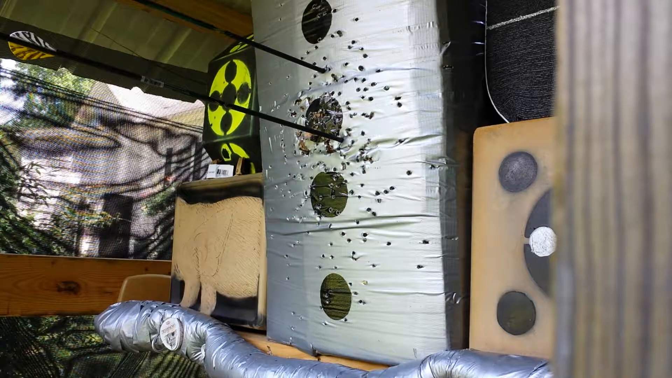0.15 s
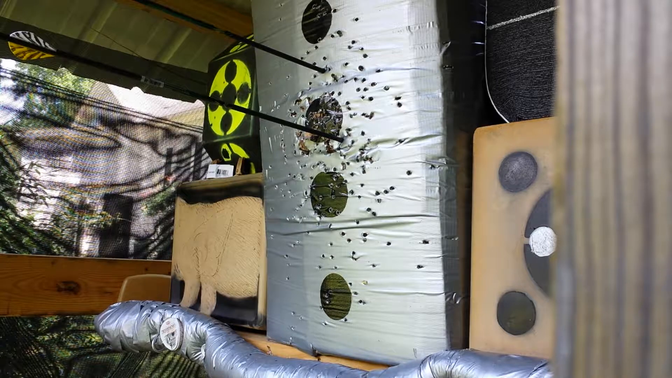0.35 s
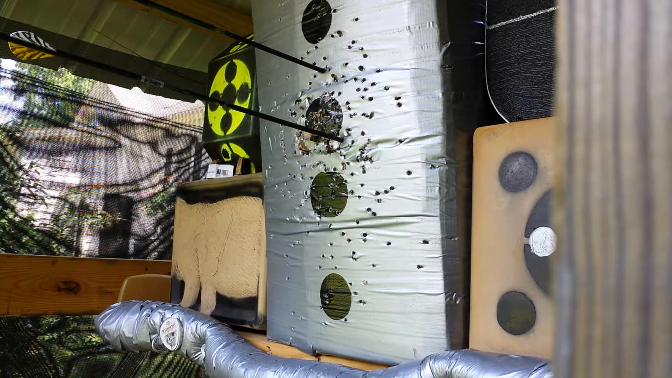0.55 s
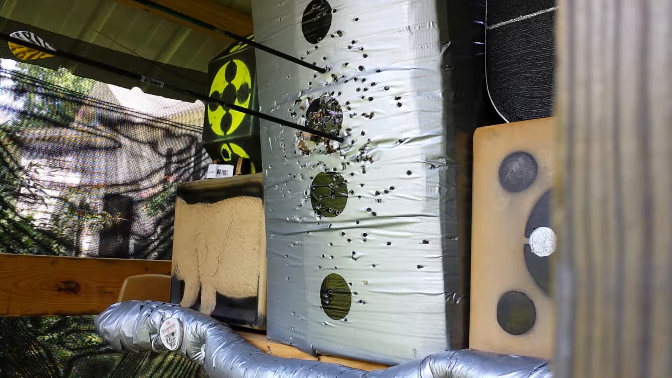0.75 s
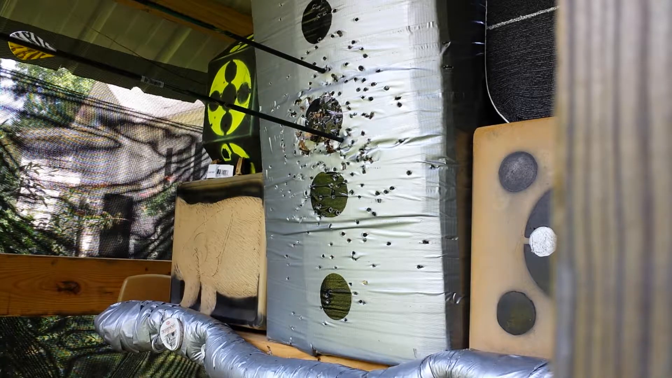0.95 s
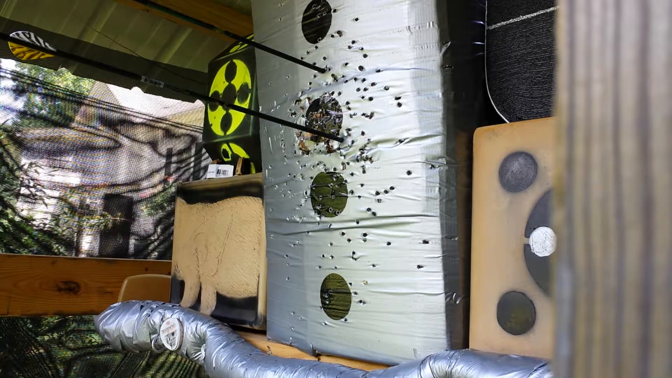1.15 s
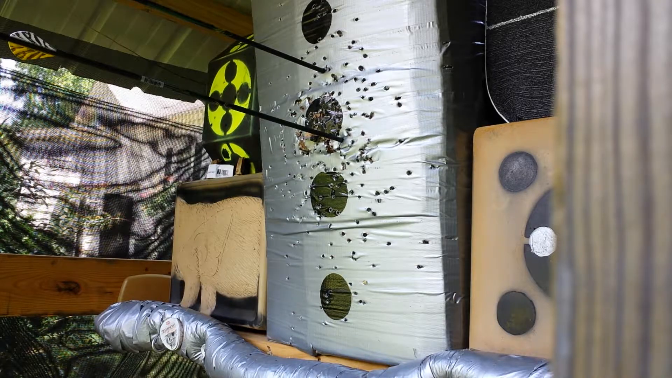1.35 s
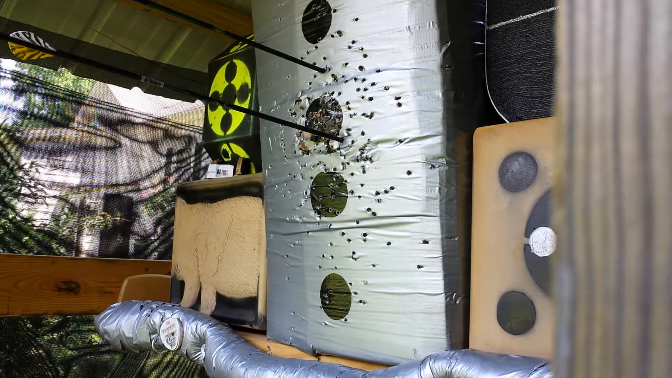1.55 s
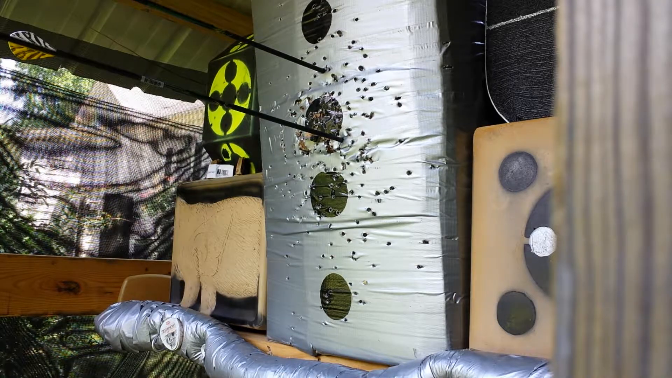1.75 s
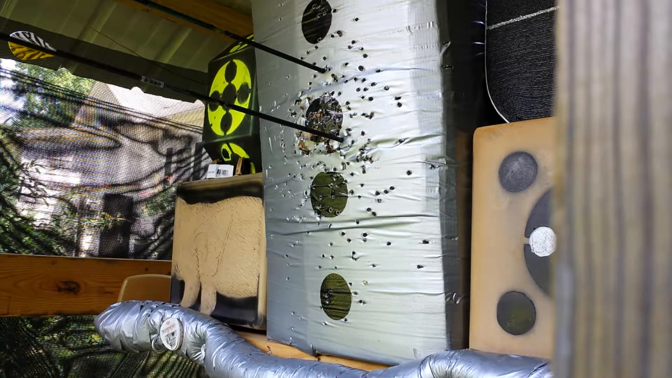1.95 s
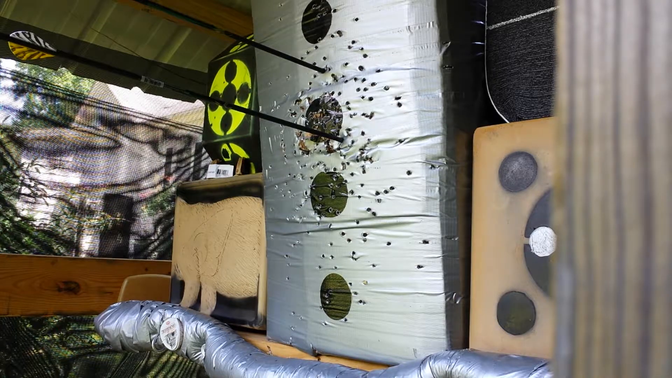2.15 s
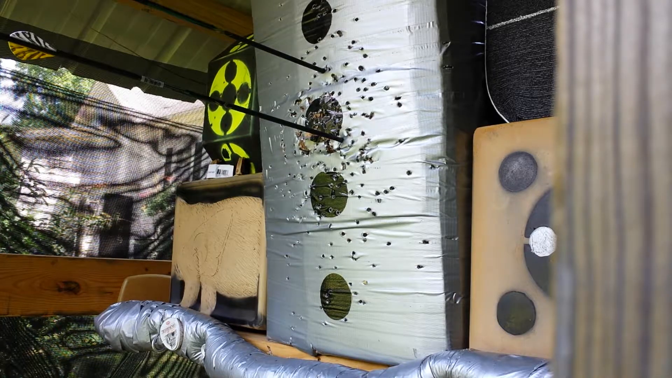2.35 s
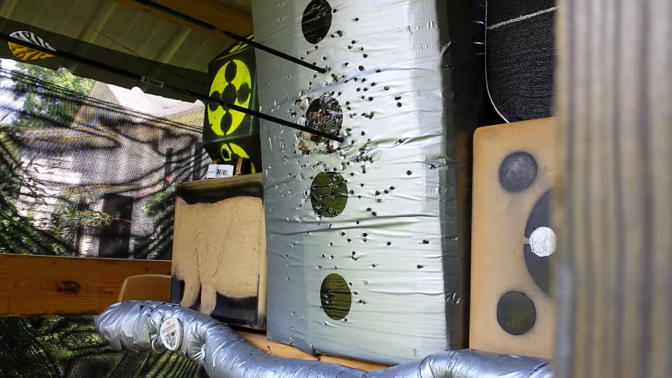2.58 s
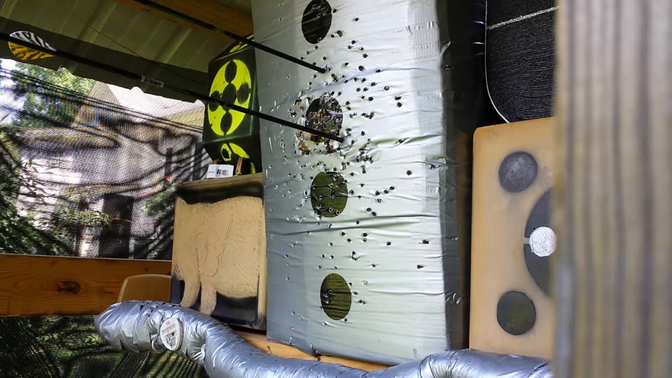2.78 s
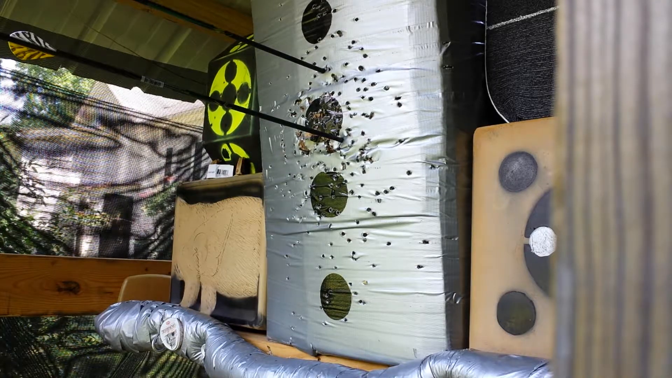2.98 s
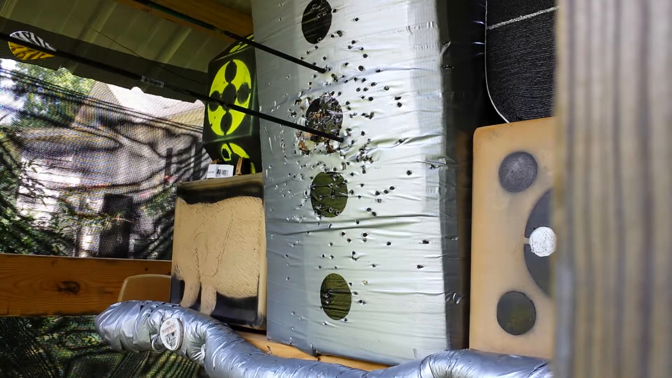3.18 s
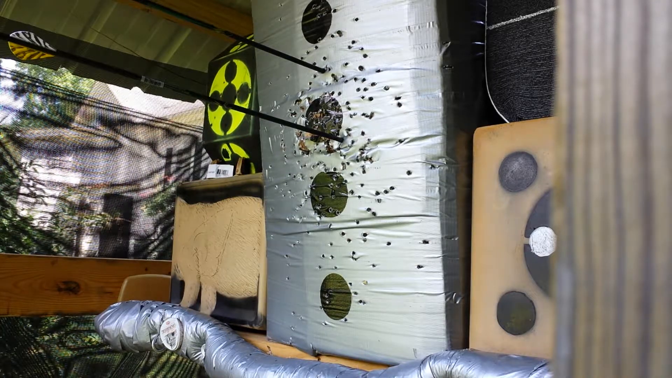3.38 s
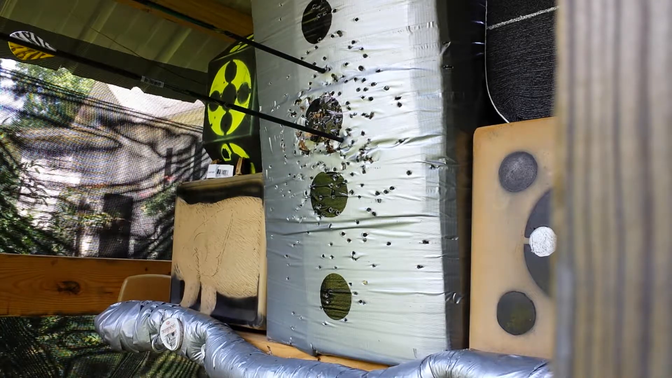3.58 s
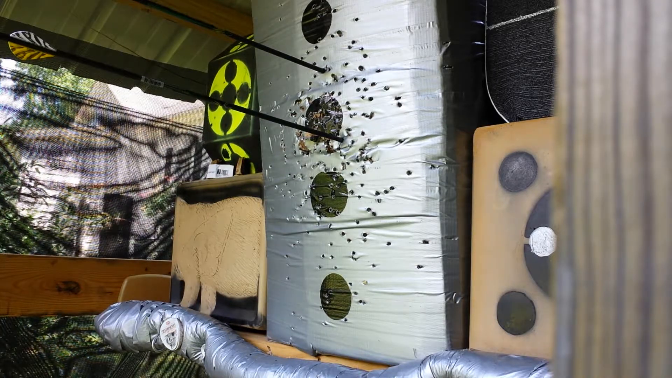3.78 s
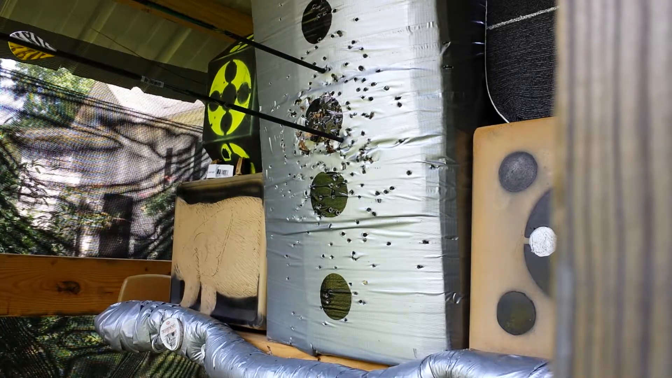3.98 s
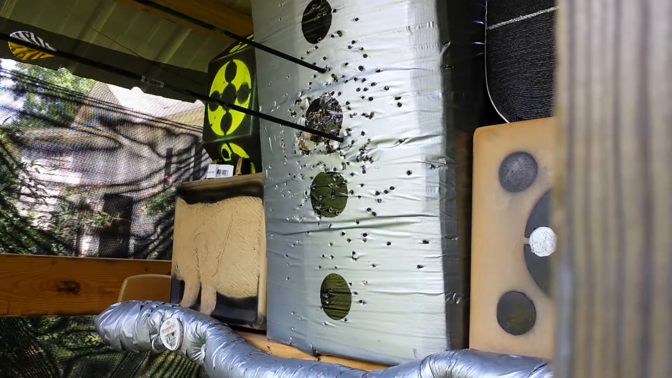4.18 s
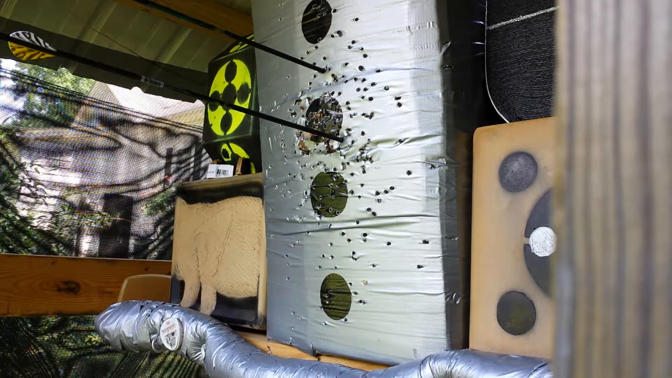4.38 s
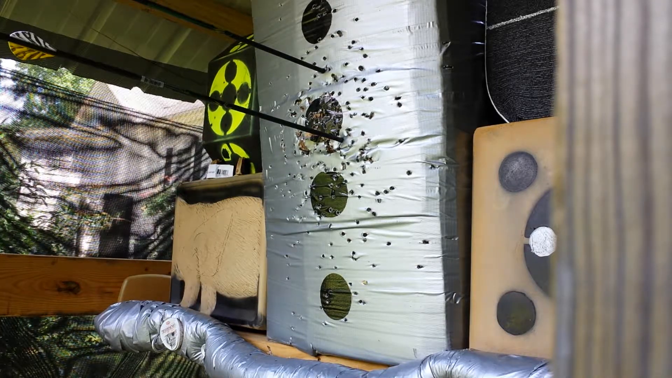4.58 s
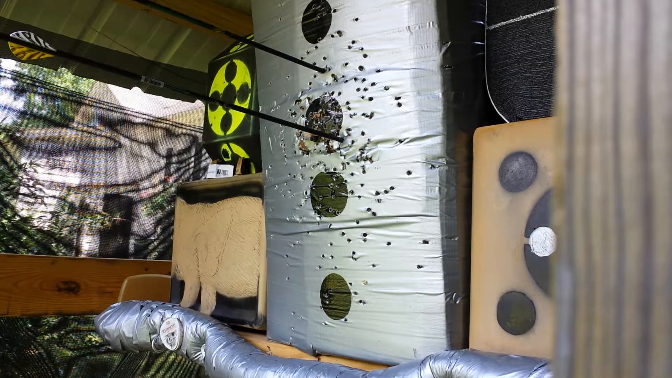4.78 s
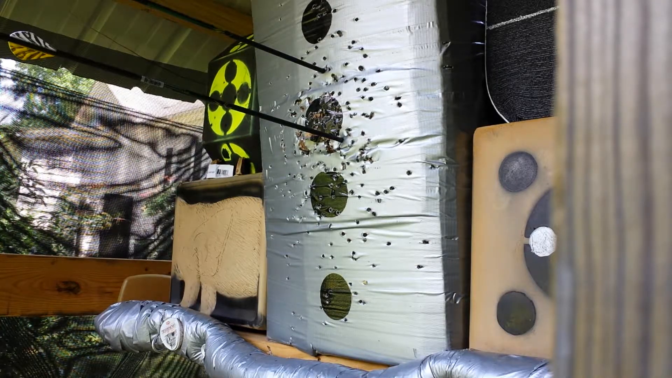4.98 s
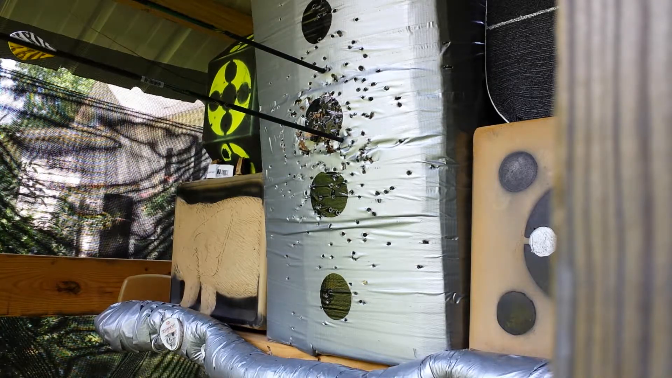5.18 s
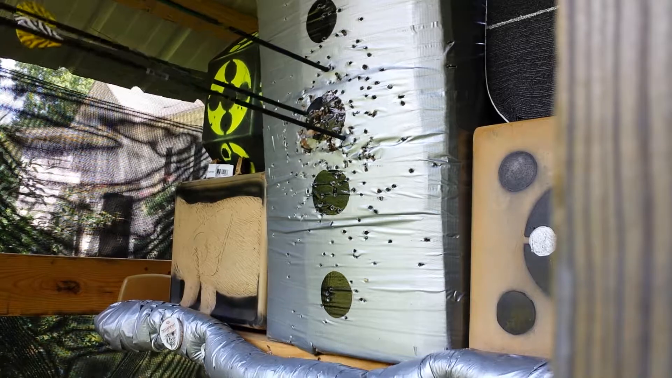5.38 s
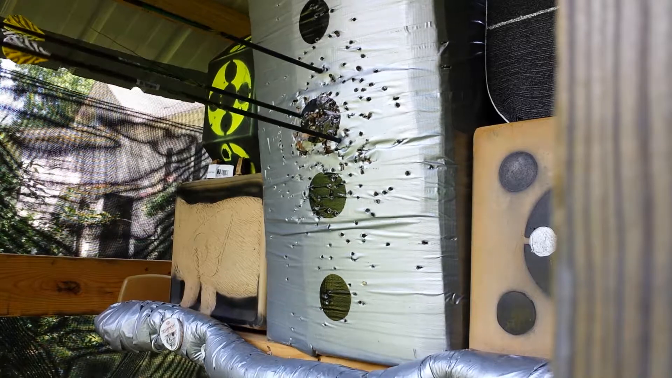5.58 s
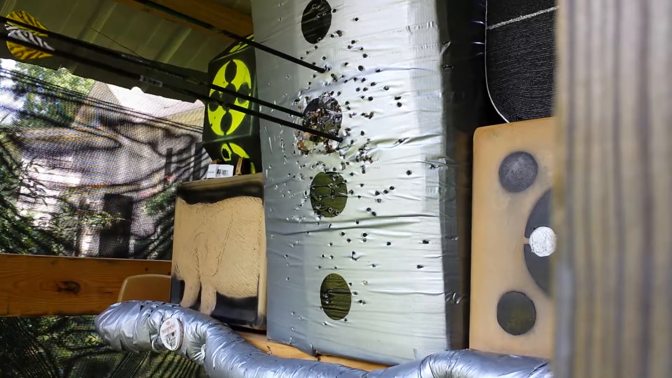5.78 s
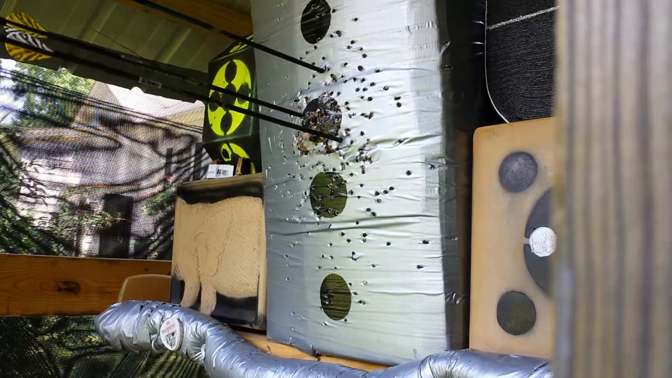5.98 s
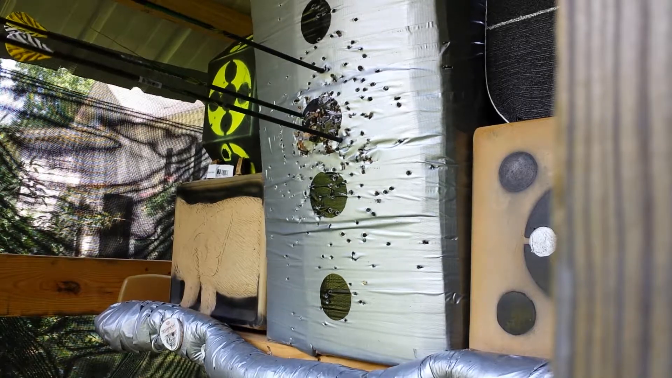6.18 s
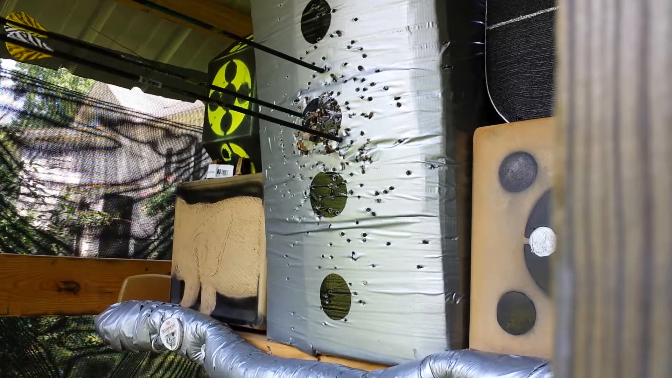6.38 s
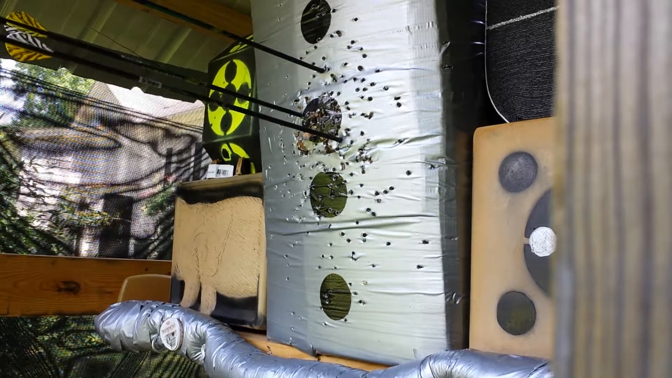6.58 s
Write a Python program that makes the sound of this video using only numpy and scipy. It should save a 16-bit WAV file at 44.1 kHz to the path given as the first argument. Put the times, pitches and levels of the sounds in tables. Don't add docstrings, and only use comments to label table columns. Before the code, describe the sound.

Over faint outdoor hiss, a distant bow snaps and an arrow hisses in, smacking a foam block very loudly beside the microphone, with a wall echo.

```python
import sys
import numpy as np
from scipy import signal
from scipy.fft import rfft, irfft
from scipy.io import wavfile
from scipy.ndimage import uniform_filter1d

SR = 44100
rng = np.random.default_rng(int(sys.argv[2]) if len(sys.argv) > 2 else 0)


def linear_from_db(decibels):
    return 10 ** (np.asarray(decibels, float) / 20)


def pcm_store(signal):
    levels = np.round(np.clip(np.atleast_2d(signal), -1, 1) * 32767)
    wavfile.write(sys.argv[1], SR, levels.astype(np.int16).T)


N = 292824
BOW_S, SMACK_S = 4.801, 5.2848


def evened(x):
    return x / np.sqrt(np.mean(x ** 2) + 1e-20)


def read(points, hz):
    f, value = np.transpose(points)
    return np.interp(np.log(hz + 1), np.log(f + 1), value)


def add(mix, s, sound):
    part = mix[:, round(s * SR):][:, :sound.shape[1]]
    part += sound[:, :part.shape[1]]


def ports(colour, tilt, hz):
    return linear_from_db(read(colour, hz) - np.outer([0, 1], read(tilt, hz)))


def resonate(x, hz, width_hz):
    turn = np.exp(2j * np.pi * np.cumsum(hz * np.ones(x.shape[-1])) / SR)
    r = np.exp(-np.pi * width_hz / SR)
    return 2 * (turn * signal.lfilter([1 - r], [1, -r], x / turn)).real


def dying(colour, tilt, t60, rise_s, same, size=2 ** 15):
    hz, t = np.fft.rfftfreq(size, 1 / SR), np.arange(size) / SR
    a, b = rfft(rng.standard_normal((2, size)))
    z = ports(colour, tilt, hz) * np.array([a, same * a + np.sqrt(1 - same ** 2) * b])
    z /= np.std(irfft(z[0]))
    centres_hz, decays_s = np.transpose(t60)
    sound = 0
    for one, decay_s in zip(np.eye(len(t60)), decays_s):
        band = np.interp(np.log(hz + 1), np.log(centres_hz), one)
        sound = sound + irfft(z * band) * linear_from_db(-60 * t / decay_s)
    return sound * (1 - np.exp(-t / rise_s))


def click(colour, tilt, size=4096):
    log_gain = np.log(ports(colour, tilt, abs(np.fft.fftfreq(size, 1 / SR))))
    causal = np.exp(signal.hilbert(log_gain).conj())
    pulse = np.fft.ifft(causal).real[:, :size // 2]
    return -pulse / abs(pulse[0]).max()


# (time after blow [s], left [dB], right [dB])
CRACKS = [(0, 6, 5.5), (.0004, 3.5, 10), (.0008, 1.5, -6.5), (.0017, -6.5, -7), (.0036, -3, -1.5),
          (.0058, -4, -10.5), (.0092, -15.5, -8.5), (0.0123, -12, -25), (.0245, -14, -22.5)]
# (frequency [Hz], density [dB/Hz])
SKIN = [(60, -22), (300, -10.5), (620, -6), (1300, -8.5), (2000, -8), (2600, 1.5), (3300, 3.5), (4200, -3),
        (5400, 1.5), (6400, -4.5), (7850, -12), (9500, -20.5), (12200, -24), (15500, -24.5)]
# (frequency [Hz], left minus right [dB])
SKIN_TILT = [(60, 0.5), (380, 10), (700, -1.5), (1290, 5), (2380, -1.5), (4400, 3.5), (6000, 0.5),
             (8120, -1), (12000, -6.5), (15000, -7.5)]
# (frequency [Hz], t60 [s])
SKIN_T60 = [(200, .1), (600, 0.071), (1500, 0.028), (3000, 0.022), (5500, 0.03), (9000, 0.037),
            (14000, 0.041)]


def crack_and_tear():
    sound = linear_from_db(-6) * dying(SKIN, SKIN_TILT, SKIN_T60, 0.00021, same=.6)
    crack = click(SKIN, SKIN_TILT)
    for after_s, left_db, right_db in CRACKS:
        add(sound, after_s, crack * linear_from_db([[left_db], [right_db]]))
    sound[0] = np.roll(sound[0], 6)
    return sound


# (frequency [Hz], peak [dB], t60 [s], start after blow [s], rise [s])
BLOCK = [(130.5, 1, 0.051, 0.0038, 0.0095), (87.7, -26, 0.17, 0.0044, 0.0155),
         (332, -13, 0.078, 0.00099, 0.011), (170, -11, 0.058, 0.0034, 0.011),
         (165, -25.5, 0.2, 0.0024, .01), (247, -15.5, 0.045, 0.00477, 0.0025),
         (472, -24.5, 0.079, 0.00057, 0.0027), (626, -15, 0.052, .0005, 0.0011),
         (762, -23, 0.04, .0005, .001), (938, -16, 0.026, 0.00033, 0.00064)]


def block_thud():
    sound = np.zeros((2, 2 ** 15))
    t = np.arange(SR // 2) / SR
    for hz, db, t60, after_s, rise_s in BLOCK:
        ring = linear_from_db(db - 60 * t / t60) * np.sin(2 * np.pi * hz * t) * (1 - np.exp(-t / rise_s))
        add(sound, after_s, ring * linear_from_db(1) * np.array([[1], [linear_from_db(-1) / linear_from_db(1)]]))
    return sound


# (frequency [Hz], t60 [s])
SHELTER_T60 = [(300, 0.094), (1000, 0.19), (3000, 0.12), (5500, 0.13), (9000, .11), (14000, 0.09)]
# (frequency [Hz], density [dB/Hz])
YARD = [(40, -6.5), (130, 1.5), (300, -11), (700, -18), (1500, -26), (2800, -16), (5500, -26.5),
        (9000, -36), (15500, -39)]
# (frequency [Hz], t60 [s])
YARD_T60 = [(60, 0.8), (200, 0.8), (1000, 0.32), (3000, 0.77), (8000, 0.1)]


def blow_tails():
    shelter = linear_from_db(-18) * dying(SKIN, SKIN_TILT, SHELTER_T60, 0.002, same=0.34)
    return shelter + linear_from_db(-34.5) * dying(YARD, AIR_TILT, YARD_T60, .01, same=0.55)


# (frequency [Hz], left [dB], right [dB], length [s])
SLAP = [(1840, -17, -22, 0.00028), (8460, -42, -32, .0008), (400, -41, -38, 0.00068)]
SLAP_HALF = 150


def string_slap():
    left_late_s = 0.00029
    t = (np.arange(2 * SLAP_HALF) - SLAP_HALF) / SR - np.array([[left_late_s], [0]])
    sound = np.zeros((2, 2 * SLAP_HALF))
    for hz, left_db, right_db, length_s in SLAP:
        wavelet = np.cos(2 * np.pi * hz * t) * np.exp(-(t / length_s) ** 2)
        sound += linear_from_db([[left_db], [right_db]]) * wavelet
    return sound


# (frequency [Hz], density [dB/Hz])
BOW = [(60, -11), (220, 1.5), (500, -8), (1200, 1.5), (1800, -6), (2300, 2), (3300, 2), (5200, -3.5),
       (7500, -14), (10000, -19.5), (12300, -23), (15500, -31)]
# (frequency [Hz], left minus right [dB])
BOW_TILT = [(60, 8), (130, 11), (290, 2), (640, 10), (1410, 9), (3100, 8.5), (6820, -3.5), (15000, -12)]
# (frequency [Hz], t60 [s])
BOW_T60 = [(200, 0.24), (1000, 0.22), (1800, 0.2), (3000, 0.16), (6000, 0.34), (12000, 0.17)]


def bow_ring():
    ring = linear_from_db(-33.5) * dying(BOW, BOW_TILT, BOW_T60, 0.0014, same=.3)
    size = ring.shape[1]
    t = np.arange(size) / SR
    handle = evened(resonate(resonate(rng.standard_normal(size), 1800, 300), 1800, 300))
    ring += linear_from_db(-52 - 60 * t / 0.3) * handle * linear_from_db([[2], [-2]])
    rattle_db = 2.2 * evened(uniform_filter1d(rng.standard_normal(size), size=50))
    return ring * linear_from_db(rattle_db)


# (frequency [Hz], density [dB/Hz])
VANES = [(200, -45), (1200, -22.5), (2500, -5.5), (4000, -6), (5400, 1), (7000, -13), (10000, -26.5),
         (15500, -29.5)]
# (frequency [Hz], left minus right [dB])
VANES_TILT = [(1000, 2.5), (3000, 6.5), (5500, 11), (8000, -7.5), (14000, -10)]


def flight(size=2 ** 15):
    speed_m_s, miss_m, hiss_db_at_1_m = 66, 0.96, -29.5
    post_s, post_width_s, post_db = 5.269, 0.0055, -7
    yard_echo_db, yard_echo_rise_s, yard_echo_t60_s = -42, 0.018, 1.2
    t = np.arange(size) / SR
    gains = ports(VANES, VANES_TILT, np.fft.rfftfreq(size, 1 / SR))
    hiss = irfft(rfft(rng.standard_normal((2, size))) * gains)
    flutter_db = 1.5 * evened(uniform_filter1d(rng.standard_normal(size), size=150))
    to_go_s = SMACK_S - BOW_S - t
    hidden_db = post_db * np.exp(-((BOW_S + t - post_s) / post_width_s) ** 2)
    near = linear_from_db(hiss_db_at_1_m + hidden_db) / np.hypot(speed_m_s * to_go_s, miss_m)
    yard_echo = linear_from_db(yard_echo_db - 60 * t / yard_echo_t60_s) * (1 - np.exp(-t / yard_echo_rise_s))
    return hiss / np.std(hiss[0]) * linear_from_db(flutter_db) * np.hypot(near, yard_echo) * (to_go_s > 0)


# (time [s], peak [dB], frequency [Hz], t60 [s], left minus right [dB])
TICKS = [
    (2.913, -40, 5600, .03, 28),
    (4.745, -46, 9000, .05, -6),
    (4.794, -37, 8000, .1, -15),
    (5.422, -42, 1150, 0.16, 7),
    (5.428, -39, 740, .4, 2),
    (5.5674, -23.5, 2800, 0.058, 6),
    (5.66, -37, 2270, .03, 9),
]


def tick(db, hz, t60, pan_db, order=3):
    t = np.arange(min(round(1.5 * t60 * SR), SR // 2)) / SR
    drive = t60 * rng.standard_normal((2, len(t))) * linear_from_db(-60 * t / t60)
    drive[:, 0] = -1
    width_hz = max(.45 * hz, 600)
    low_hz = max(hz - width_hz / 2, hz / 10)
    high_hz = min(hz + width_hz / 2, SR / 2 - hz / 10)
    band = signal.butter(order, [low_hz, high_hz], "band", fs=SR, output="sos")
    burst = signal.sosfilt(band, drive)
    return burst / abs(burst).max() * linear_from_db(db) * linear_from_db([[pan_db / 2], [-pan_db / 2]])


# (start [s], length [s], middle pitch [Hz], glide [Hz], level [dB])
BIRD = [(1.137, .046, 2740, -520, -56), (1.176, .058, 3320, -40, -53.5), (1.253, 0.039, 3260, 0, -60),
        (1.29, .03, 2980, 60, -60), (2.985, .044, 2830, -600, -57.5), (3.075, 0.035, 2260, -60, -63),
        (3.155, .025, 3040, 100, -57), (3.197, .018, 3650, 0, -62), (3.215, .022, 2790, -250, -57),
        (4.585, .03, 2860, 0, -62), (4.622, .02, 2820, 60, -67), (4.658, 0.021, 2854, 60, -59),
        (4.7, .022, 3160, -80, -57), (4.714, 0.025, 2840, 80, -57.5), (6.088, 0.032, 2800, -280, -57),
        (6.12, 0.042, 2870, 40, -55), (6.156, .028, 2760, 60, -61), (6.265, .04, 2800, 120, -54),
        (6.316, .022, 2770, 40, -62), (6.415, 0.028, 2830, 0, -62)]


def bird(length_s, hz, glide_hz, db):
    sag_hz_per_s2, glide_ease = 784000, 3.6
    t = np.arange(-length_s / 2, length_s / 2, 1 / SR)
    glide = glide_hz * (t / length_s - glide_ease * (t / length_s) ** 2)
    pitch_hz = hz + glide - sag_hz_per_s2 * t ** 2
    leaves_db = 2.2 * evened(uniform_filter1d(rng.standard_normal(4000), size=300))[:len(t)]
    swell = np.sqrt(2) * linear_from_db(db + leaves_db) * np.cos(np.pi * t / length_s)
    note = swell * np.sin(2 * np.pi * np.cumsum(pitch_hz) / SR)
    echo = rng.standard_normal((2, 4000)) * linear_from_db(-35 - 60 * np.arange(4000) / SR / .3)
    echo[:, 0] = 1
    return signal.fftconvolve(note[None], echo, axes=1) * linear_from_db([[3], [-3]])


IDLE_DB = -59
# (nearest at [s], hum [Hz], hum [dB])
PASSES = [(.6, 112, -54), (1.15, 111, -54.5), (1.65, 112, -51), (2.3, 118, -61), (3.45, 100, -56.5),
          (3.9, 120, -56)]


def engines(t):
    idle_hz, pass_s = 116, .2
    s, hz, db = np.transpose(PASSES)[:, :, None]
    power = linear_from_db(2 * db) * np.exp(-((t - s) / pass_s) ** 2)
    idle = linear_from_db(2 * IDLE_DB)
    total = power.sum(0) + idle
    return ((power * hz).sum(0) + idle * idle_hz) / total, 10 * np.log10(total)


# (frequency [Hz], density [dB/Hz])
AIR = [(20, -23), (40, -7), (114, -3), (200, -8), (330, -13), (640, -8), (1290, -14.5), (3000, -13),
       (4200, -11.5), (5570, -6), (6600, -12.5), (8140, -20.5), (11300, -33), (15500, -30.5)]
# (frequency [Hz], left minus right [dB])
AIR_TILT = [(60, 11), (99, -2), (160, 6), (270, 2.5), (450, 3.5), (740, 6), (1220, 7.5), (2010, 6.5),
            (3330, 7), (5500, 13), (9080, -3.5), (15000, 2.5)]
# (frequency [Hz], left-right likeness [0-1])
AIR_SAME = [(90, 0.94), (250, 0.9), (500, 0.9), (900, 0.1), (1400, 0.1), (2000, 0.14), (3000, 0.2),
            (4200, 0.3), (5500, 0), (7000, 0.05), (8500, 0), (11000, 0.05), (14500, 0.16)]


def air():
    right_late_s, rumble_share = 18 / 44100, .15
    frames, hz = N // 256 + 5, np.fft.rfftfreq(1024, 1 / SR)
    a, b, c, d, patches = rng.standard_normal((frames, 513, 5)).T
    patches = evened(uniform_filter1d(uniform_filter1d(patches, size=12, axis=0), size=14, axis=1))
    frame_hum_db = engines(np.arange(frames) * 256 / SR)[1]
    swell_db = np.outer(1 / (1 + (hz / 400) ** 2), rumble_share * (frame_hum_db - IDLE_DB))
    same = np.clip(read(AIR_SAME, hz), 0, 1)[:, None]
    late = np.exp(-2j * np.pi * hz * right_late_s)[:, None]
    left = a + 1j * b
    right = same * late * left + np.sqrt(1 - same ** 2) * (c + 1j * d)
    z = np.array([left, right]) * ports(AIR, AIR_TILT, hz)[:, :, None] * linear_from_db(0.52 * patches + swell_db)
    wash = signal.istft(z, nperseg=1024, noverlap=768)[1][:, :N]
    hum_hz, hum_db = engines(np.arange(N) / SR)
    hum = evened(resonate(rng.standard_normal(N), hum_hz, 15)) * linear_from_db(hum_db)
    return linear_from_db(-45) * wash / np.std(wash[0]) + hum * linear_from_db([[0], [-3]])


def scene():
    mix = air()
    add(mix, SMACK_S, crack_and_tear() + block_thud() + blow_tails())
    add(mix, BOW_S - SLAP_HALF / SR, string_slap())
    add(mix, BOW_S, bow_ring())
    add(mix, BOW_S, flight())
    for s, *row in TICKS:
        add(mix, s, tick(*row))
    for s, *row in BIRD:
        add(mix, s, bird(*row))
    return mix


# (frequency [Hz], level [dB])
WHINE = [(7000, -78), (8000, -69), (9000, -86.5), (14000, -95.5), (15000, -96)]
# (multiple of 775 Hz [-], level [dB])
MOTOR = [(8, -71), (9, -76.5), (10, -72.5), (11, -77), (13, -83.5), (14, -80.5), (15, -85)]


def camera_whine(t):
    whine = sum(np.sqrt(2) * linear_from_db(db) * np.sin(2 * np.pi * hz * t) for hz, db in WHINE)
    for multiple, db in MOTOR:
        whine += linear_from_db(db) * evened(resonate(rng.standard_normal(N), multiple * 775, 16))
    return whine * linear_from_db([[-12], [0]])


def camera_gain_db(t):
    sink_from_s, sink_db, sink_s = 5.3, -20.5, .3
    release_s, release_width_s = 6.346, .12
    sunk = 1 - np.exp(-np.maximum(t - sink_from_s, 0) / sink_s)
    return sink_db * sunk / (1 + np.exp((t - release_s) / release_width_s))


def low_pass(x):
    return signal.sosfilt(signal.butter(12, 16650, fs=SR, output="sos"), x)


def record(dry):
    bass_hz, bass_sink_share = 399, .7
    edge_hz, edge_width_hz, edge_db = 15350, 300, -38
    t = np.arange(N) / SR
    x, gain_db = dry + camera_whine(t), camera_gain_db(t)
    bass = signal.lfilter(*signal.butter(1, bass_hz, fs=SR), x)
    x = (x - bass) * linear_from_db(gain_db) + bass * linear_from_db(bass_sink_share * gain_db)
    x = signal.sosfilt(signal.butter(2, 40, "high", fs=SR, output="sos"), x)
    x = x / (1 + abs(x) ** 4) ** (1 / 4)
    past_edge = np.clip((np.fft.rfftfreq(N, 1 / SR) - edge_hz) / edge_width_hz, 0, 1)
    x = irfft(rfft(x) * linear_from_db(edge_db * past_edge ** 2), N)
    return low_pass(x)


dry = scene()
out = record(dry)
pcm_store(out)
```